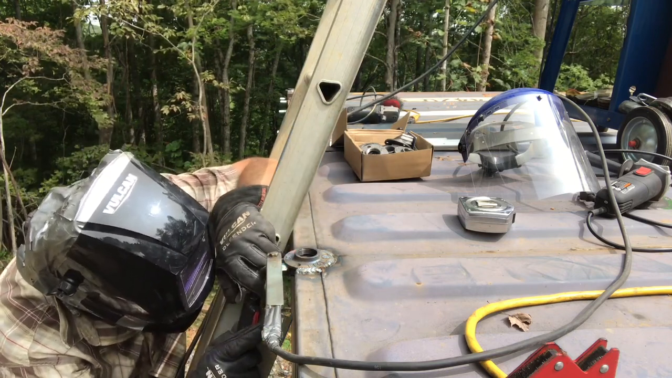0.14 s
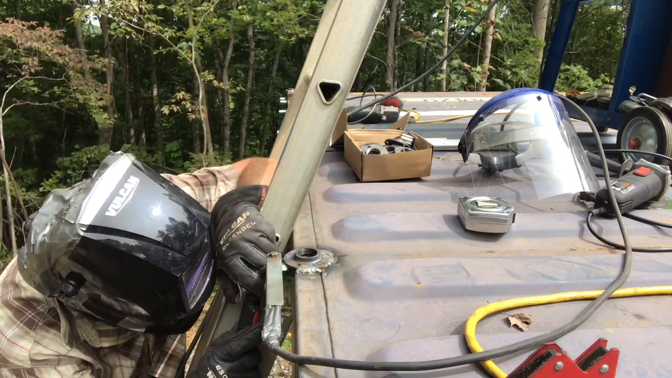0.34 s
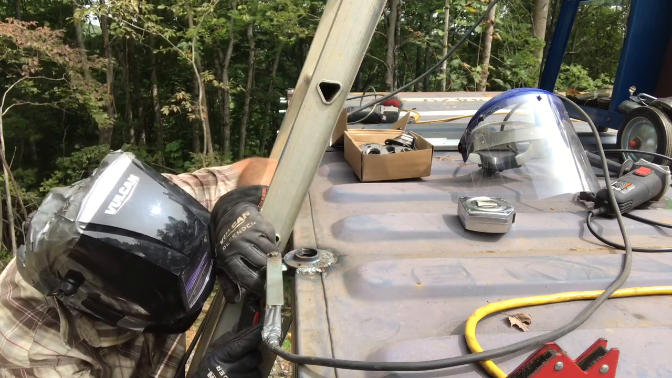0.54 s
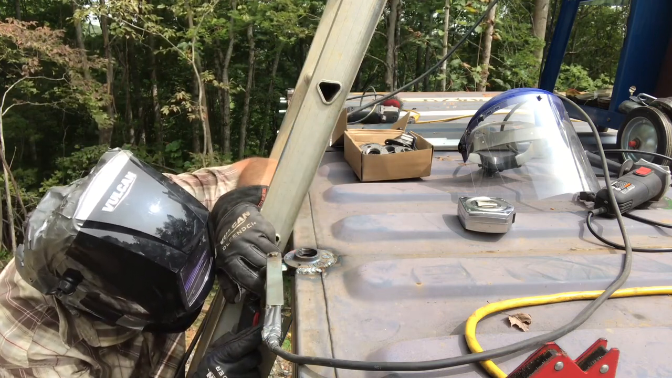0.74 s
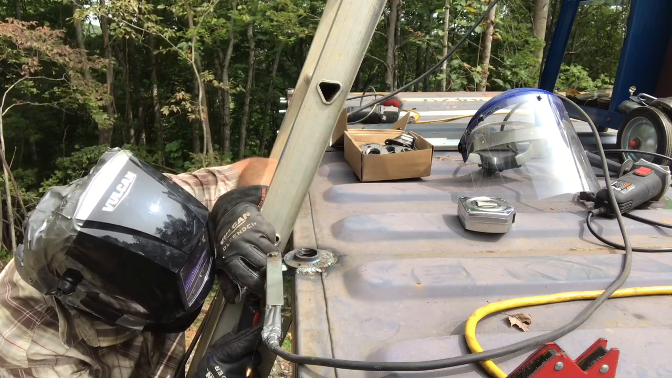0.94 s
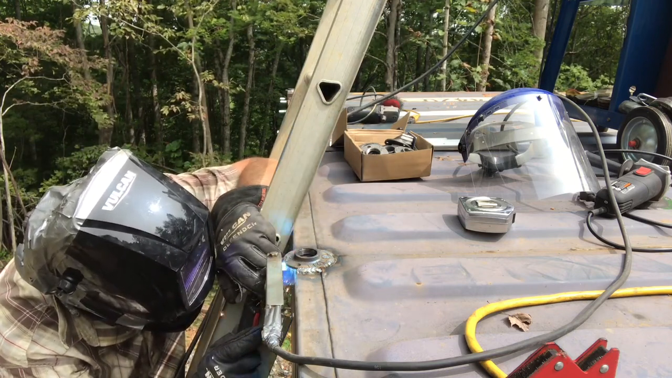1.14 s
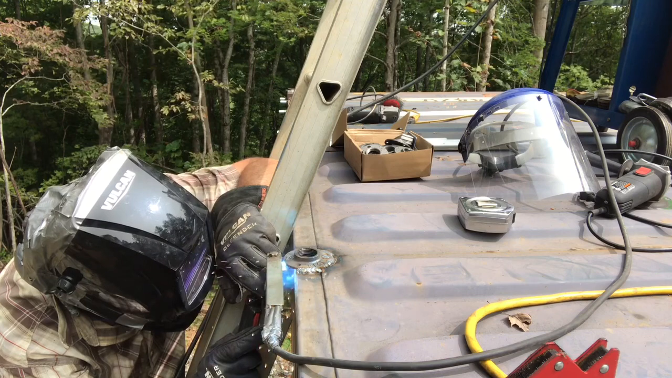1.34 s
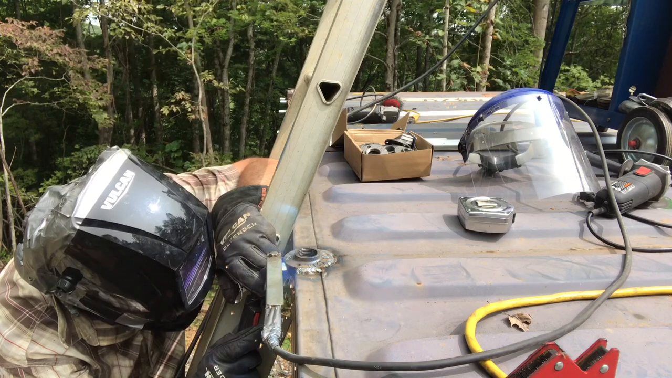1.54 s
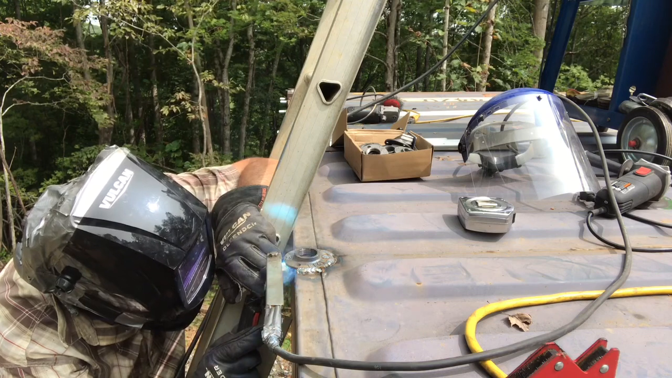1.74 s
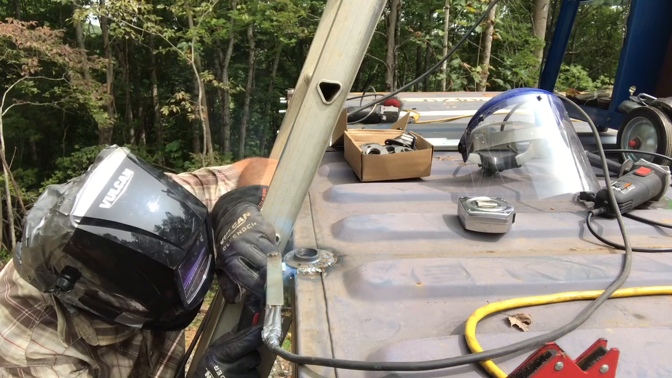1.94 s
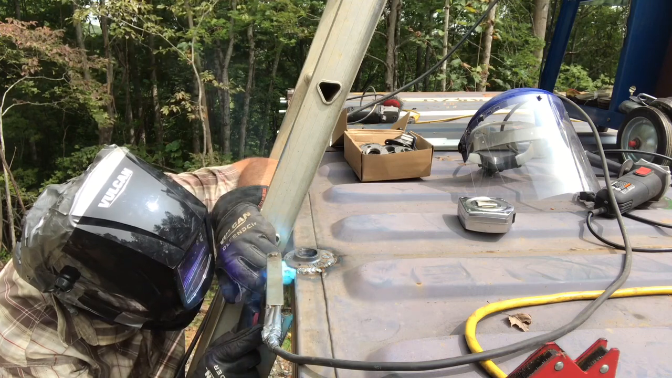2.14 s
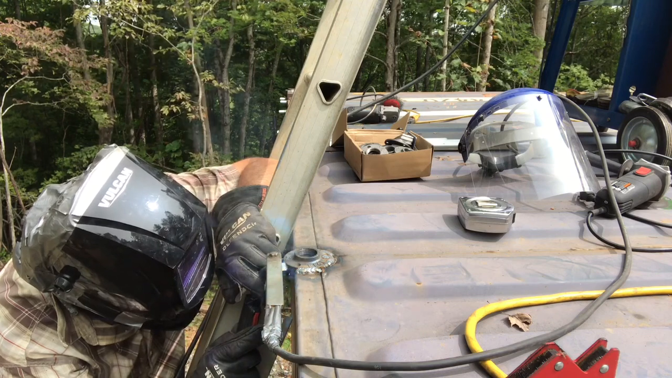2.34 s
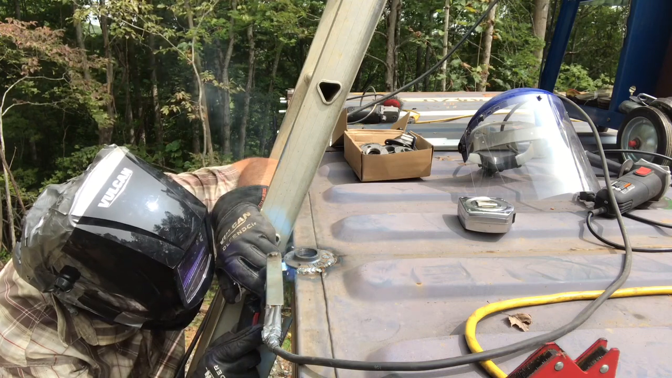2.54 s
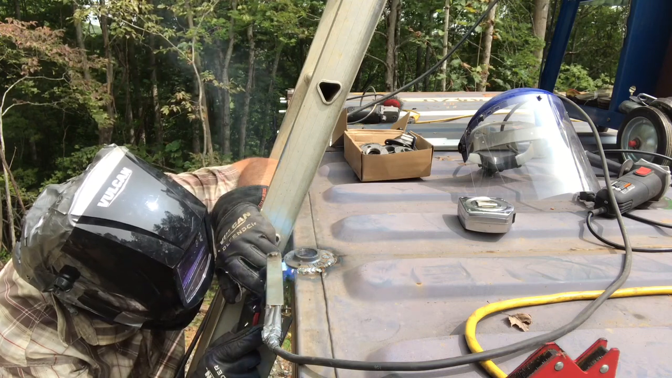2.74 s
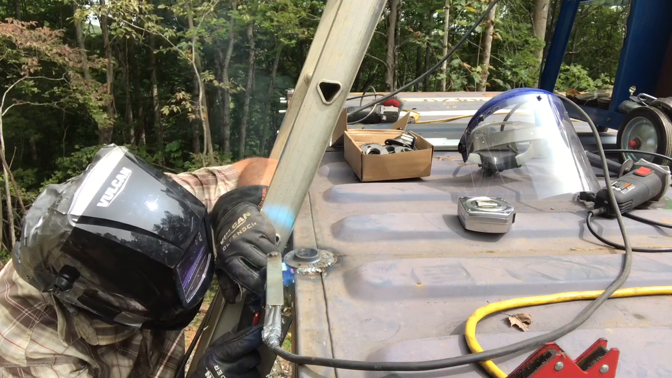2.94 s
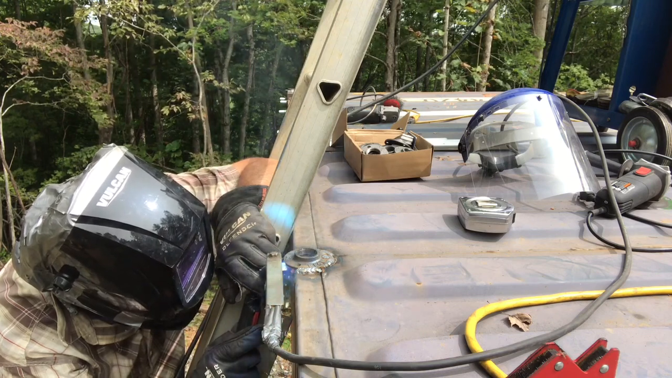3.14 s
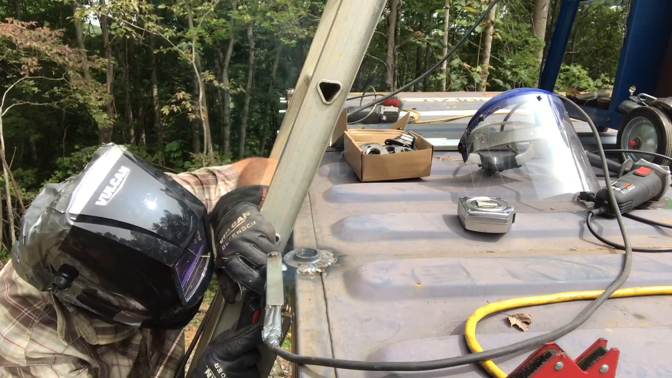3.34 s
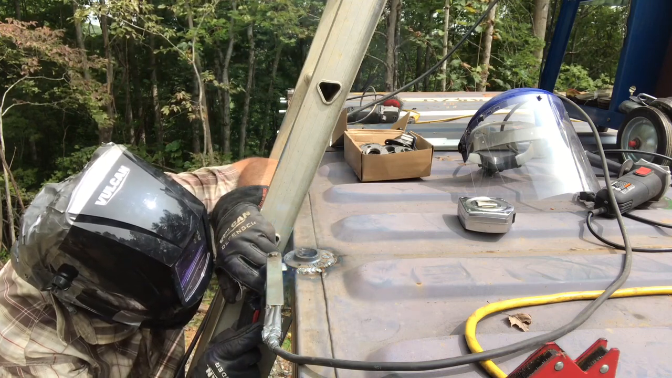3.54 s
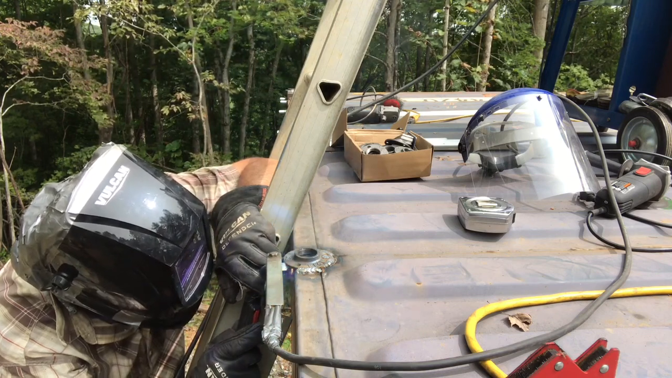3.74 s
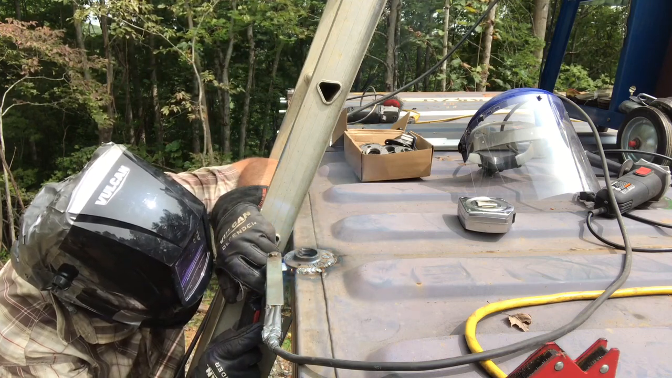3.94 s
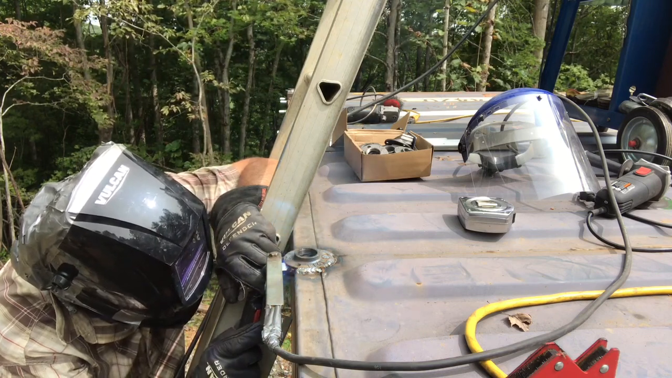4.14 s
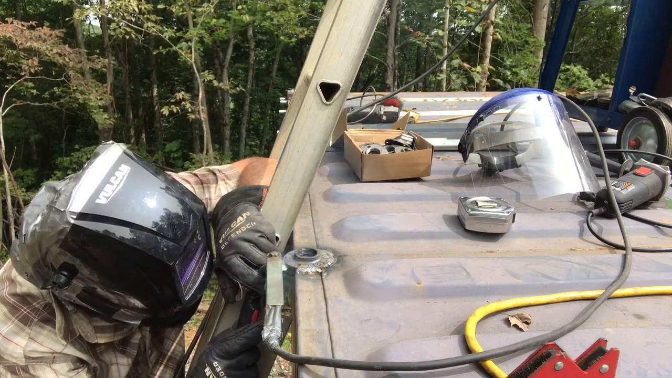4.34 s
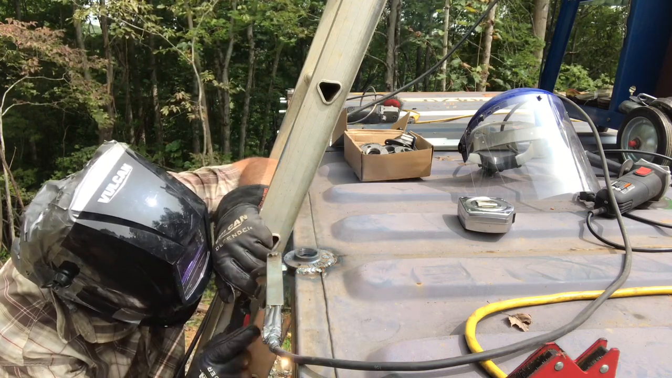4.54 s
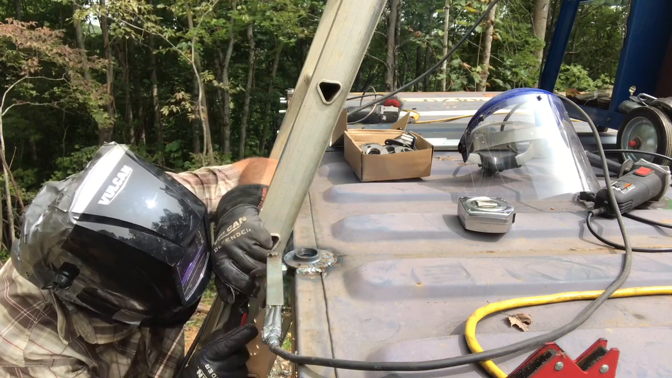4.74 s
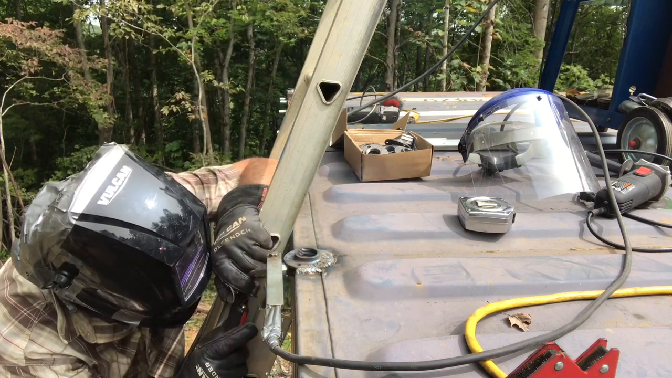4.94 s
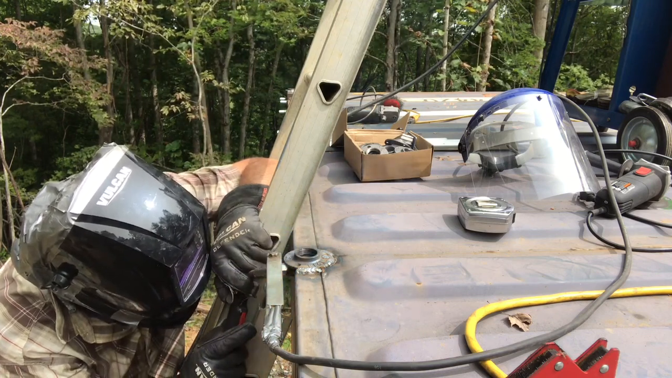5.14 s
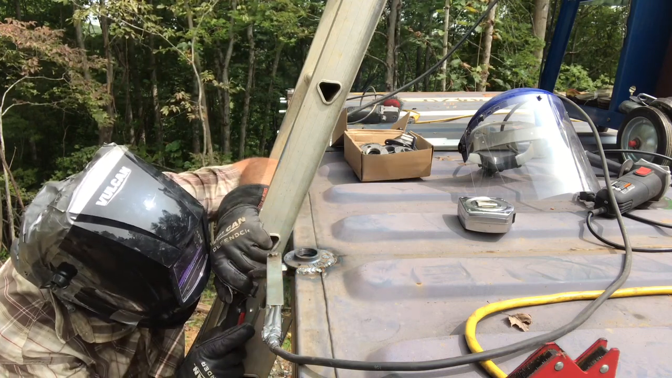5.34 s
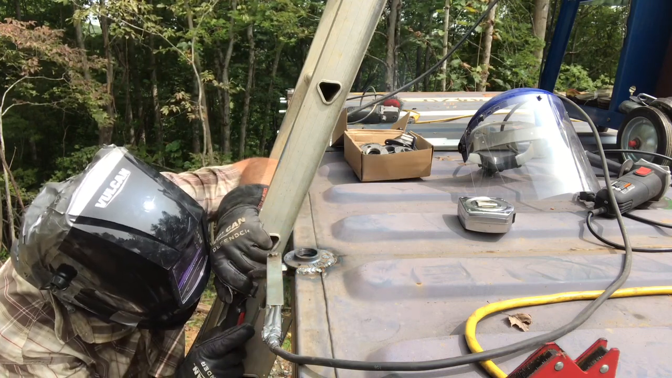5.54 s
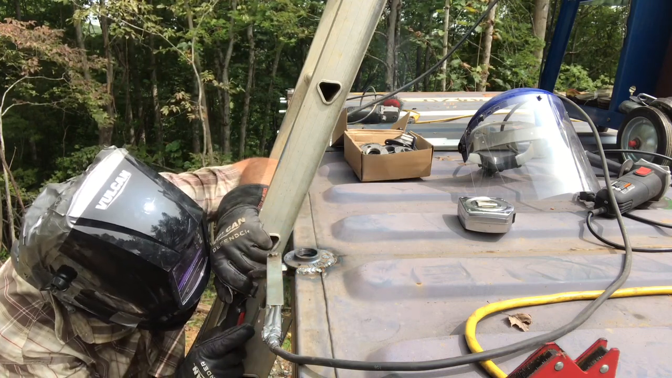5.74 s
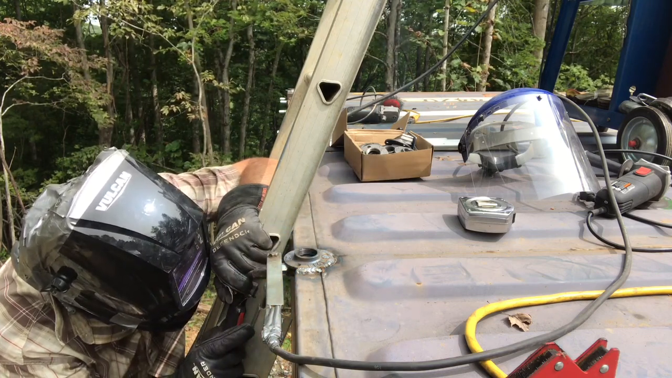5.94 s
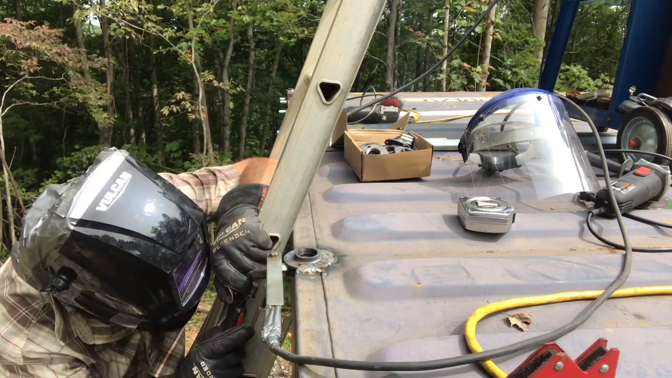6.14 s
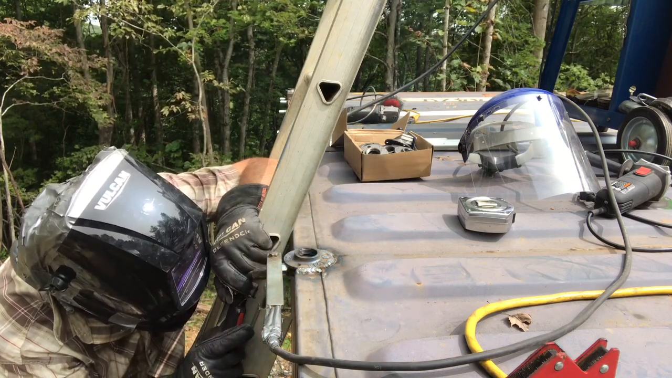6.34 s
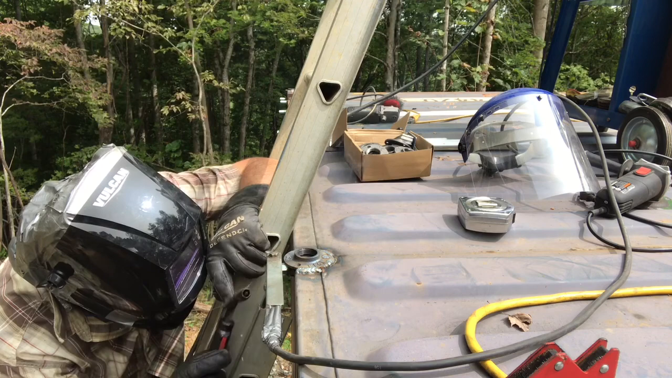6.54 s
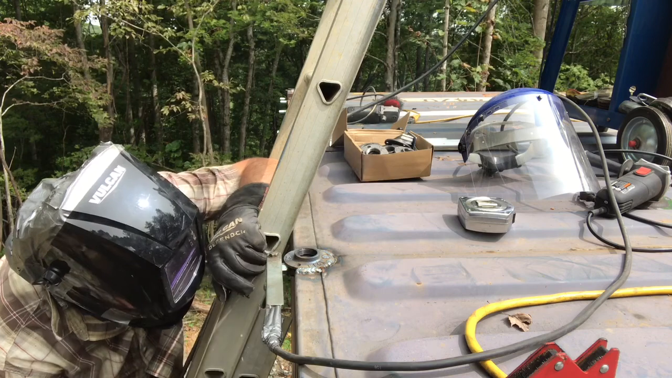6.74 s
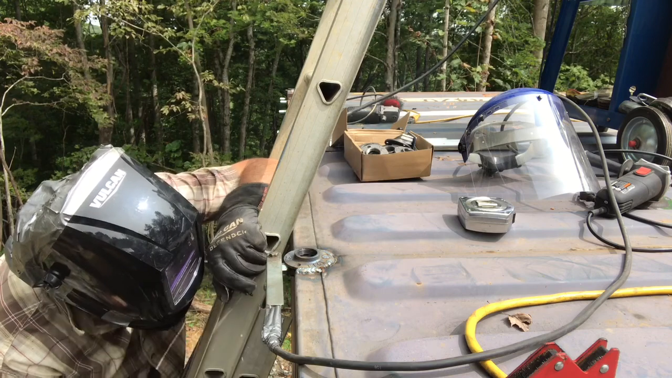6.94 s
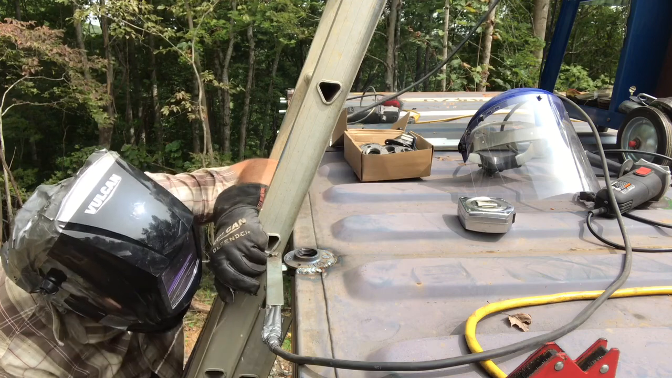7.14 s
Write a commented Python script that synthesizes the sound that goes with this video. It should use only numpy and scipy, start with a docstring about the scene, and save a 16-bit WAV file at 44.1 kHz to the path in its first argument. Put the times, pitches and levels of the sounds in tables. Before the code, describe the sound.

Sharp, spitting sparks of a tack weld on steel, then light knocks of equipment, while an engine generator hums some way off.

```python
"""Tack welding on a metal roof

A wire-feed welder tacks a steel post to a roof, outdoors. Each time the wire shorts and blows clear,
a spark cracks and echoes between post, roof and helmet; the arc sizzles and gas hisses in between.
Gear knocks and a glove slides over the steel. Some way off, an engine generator hums throughout
and sags a little under the load."""
import sys
import numpy as np
from scipy import signal
from scipy.fft import rfft, irfft, next_fast_len
from scipy.io import wavfile

SR = 44100
rng = np.random.default_rng(int(sys.argv[2]) if len(sys.argv) > 2 else 0)


def pcm_store(signal):
    """Save signal as 16-bit PCM."""
    levels = np.round(np.clip(np.atleast_2d(signal), -1, 1) * 32767)
    wavfile.write(sys.argv[1], SR, levels.astype(np.int16).T)


N = 321924
TIME = np.arange(N) / SR

# Runs of shorts while the wire feeds steadily. Each row: first and last spark in seconds, spark count,
# slowing (negative speeds up), first and last relative level in dB, brightness in dB, sizzle in dB.
SPARK_RUNS = [(1.0773, 1.102, 4, -.07, -9.5, -10.5, 7.5, -36), (1.1182, 1.177, 6, .06, -9, -10, 7, -28),
              (1.2068, 1.2535, 4, -.04, -9.5, -7, 5, -34), (1.295, 1.3532, 4, -.06, -11, -9, 6.5, -53),
              (1.3765, 1.5062, 8, .02, -11.5, -11, 4.5, -37),
              (1.5264, 1.5872, 4, -.03, -13.5, -7, 4.5, -37),
              (2.1804, 2.242, 6, .02, -11, -10.5, 8.5, -23.5),
              (2.2627, 2.3679, 6, .15, -10.5, -9, 9.5, -29), (2.4455, 2.454, 2, 0, -9.5, -10.5, 9, -27),
              (2.4847, 2.489, 2, 0, -8, -9.5, 8.5, -30), (2.5165, 2.5237, 2, 0, -9.5, -12, 10, -26),
              (2.6701, 2.7668, 6, .29, -7.5, -9.5, 8.5, -36), (2.7997, 2.945, 6, .01, -11, -11, 3.5, -41),
              (2.9786, 3.061, 4, .155, -10, -8.5, 6.5, -34.5), (3.0837, 3.1705, 4, .05, -9, -10, 5.5, -38),
              (3.2005, 3.3148, 5, -.06, -9, -9, 6, -35)]
# Stray pops as the arc strikes or stumbles.
# Each row: start in seconds, relative level in dB, brightness in dB.
STRAY_POPS = [(.852, -11, 7.5), (.9795, -7, 6), (1.3655, -19, 8), (1.7556, -10.5, 12), (1.7592, -6, 7),
              (1.7708, -19.5, 6), (1.8053, -23, 8), (1.8216, -9.5, 8.5), (1.834, -7.5, 9),
              (2.0201, -26.5, 7), (2.1142, -21.5, 6), (2.124, -9.5, 7), (2.423, -7.5, 9), (2.6366, -8.5, 9),
              (2.97, -10, 2.5), (3.2116, -9.5, 1.5), (3.3072, -22, 4), (3.4952, -10.5, 11.5)]
# Tone of a crack. Each row: frequency in Hz, level in dB.
CRACK_COLOUR = [(100, -17.5), (300, -13), (600, -10.5), (1200, -11), (2400, -1), (3600, -9), (5300, -2),
                (6500, -11), (7500, -5.5), (9700, -11), (11500, -15), (14500, -14), (16000, -28)]
# Peaks and hollows of the steel corner. Each row: centre in Hz, width in Hz, boost or cut in dB.
CORNER_RESONANCES = [(598, 470, 12), (798, 112, -15.5), (1487, 860, 8.5), (1900, 60, -0.5), (2870, 140, 4),
                     (3740, 510, 6), (4687, 160, 9.5), (4770, 170, 0), (5410, 260, 5), (7520, 270, 7.5),
                     (10700, 130, -19), (10970, 280, 8.5), (11500, 510, 7.5), (14200, 200, -19),
                     (13460, 740, 11.5), (14970, 310, 14.5)]
# Bounces off nozzle, post, roof and helmet. Each row: delay in milliseconds, signed gain.
CLOSE_ECHOES = [(0.106, -0.72), (.173, -0.84), (0.516, 0.95), (0.689, 1.15), (0.855, 1.59), (.919, -0.8),
                (1.198, 0.69), (1.357, 0.015), (1.765, 0.22), (1.88, 0.81), (1.94, -0.37), (2.3, -0.28),
                (4.187, 0.64)]
# Ring of the post. Each row: frequency in Hz, gain in dB, time to fade by 60 dB in seconds.
POST_MODES = [(1637, -64, .06), (4797, -64, .07), (5755, -60, .08), (7390, -61, .08), (10910, -65, .06),
              (13941, -62, .06), (14660, -62, .05)]
# Spells of sizzling wire. Each row: centre in seconds, relative level in dB, half length in seconds.
SIZZLE_SPELLS = [(1.052, -42, 0.021), (1.722, -33.5, 0.011), (1.752, -29, 0.0045), (1.78, -28, 0.01),
                 (1.864, -37, 0.019), (2.06, -34, 0.016), (2.119, -26, 0.0089), (2.17, -36, 0.012),
                 (2.585, -36, 0.025), (2.63, -30, 0.0016), (3.703, -48, .05), (4.241, -27.5, 0.014)]
# Tone of the sizzle. Each row: frequency in Hz, level in dB.
SIZZLE_COLOUR = [(2350, -17), (4000, -12.5), (5310, -13.5), (5730, -11), (6440, -19), (7270, -4.5),
                 (9060, -15), (11200, -11), (14600, -4.5), (16000, -1)]
# Resonances of the gas nozzle. Each row: centre in Hz, width in Hz, relative level in dB.
NOZZLE_RESONANCES = [(3210, 140, 4), (5200, 720, 1.5), (5930, 360, 4), (7100, 580, -5), (8100, 790, -5),
                     (9800, 400, -2.5), (11300, 990, -7.5), (14000, 1200, -8), (17400, 700, 4)]
# Gas flow while the trigger is held. Each row: time in seconds, flow from 0 to 1.
GAS_FLOW = [(.64, 0), (.68, 1), (4.34, 1), (4.42, 0)]
# Knocks of torch and gear. Each row: start in seconds, body centre in Hz, filter width in Hz,
# body level in dB, body decay in seconds, tick level in dB.
GEAR_KNOCKS = [(.627, 1580, 1500, -21, .03, -15), (4.645, 650, 804, -10, 0.05, -20),
               (5.005, 903, 998, -24, 0.026, -29), (5.80, 699, 999, -25, .03, -29),
               (6.768, 435, 44.9, -16.5, 0.094, -60)]
# Swell of a glove sliding on steel. Each row: time in seconds, level in dB.
GLOVE_SLIDE = [(6.5, -95), (6.54, -61), (6.64, -57), (6.8, -60), (6.95, -69), (7.05, -95)]
# Tone of the glove. Each row: frequency in Hz, level in dB.
GLOVE_COLOUR = [(5000, 4), (9000, 2), (14000, -2), (16000, -3)]
# Engine hum. Each row: multiple of the firing rate, relative level in dB.
ENGINE_HARMONICS = [(1, -25), (2, 0), (3, -16), (4, -9.5), (5, -19), (6, -26), (7, -7.5), (8, -24),
                    (9, -27), (10, -20), (11, -19), (12, -27), (14, -28), (17, -19), (21, -25), (22, -27),
                    (25, -29), (34, -26), (40, -25), (48, -22), (51, -28), (56, -30), (68, -30)]
# A second, steady hum. Each row: frequency in Hz, level in dB.
DRONE_TONES = [(49, -52.5), (73.5, -44.5), (98.3, -55.5)]
# Tone of engine clatter and forest air. Each row: frequency in Hz, level in dB.
CLATTER_COLOUR = [(180, -16), (300, -4.5), (462, -8.5), (502, -5), (528, -9), (574, -8), (678, -4.5),
                  (749, -8), (1560, -6), (2030, -10), (3190, -11), (6410, -20), (10200, -32), (14500, -40),
                  (16000, -50)]
# Tone of the exhaust rumble. Each row: frequency in Hz, level in dB.
EXHAUST_COLOUR = [(15, -22), (35, -8), (70, 12), (140, 17.5), (270, 13), (420, -21)]
# Tone of the air that differs between the ears. Each row: frequency in Hz, level in dB.
WIDE_AIR_COLOUR = [(60, -12), (130, 6.5), (220, 2), (350, -5.5), (600, -1.5), (1200, -12), (2500, -36.5),
                   (5000, -51), (16000, -60)]


def spark_train(spread_db=1.36, treble_per_db=2.17):
    """Cue every spark as (seconds, dB, brightness dB); a bigger drop bursts louder and brighter."""
    train = list(STRAY_POPS)
    for first_s, last_s, count, slowing, first_db, last_db, treble_db, _ in SPARK_RUNS:
        along = np.linspace(0, 1, round(count))
        starts = first_s + (last_s - first_s) * along * (1 - slowing * (1 - along))
        drop_db = spread_db * rng.standard_normal(len(along))
        drop_db -= drop_db.mean()
        levels = first_db + (last_db - first_db) * along + drop_db
        train += zip(starts, levels, treble_db + treble_per_db * drop_db)
    return train


def sparks(train, gain_db=-3, usual_treble_db=3, colour_spread_db=2, shift_ms=.011, size=2048):
    """Each spark is one sharp pulse, coloured by the steel corner and repeated by nearby surfaces."""
    out, hz = np.zeros(N), np.arange(size // 2 + 1) * SR / size
    corner = sum(db / (1 + (2 * (hz - f) / width) ** 2) for f, width, db in CORNER_RESONANCES)
    colour = at_hz(CRACK_COLOUR, hz) + corner
    octaves = np.log2(np.clip(hz, 1000, 16000) / 4000)
    delay_ms, gain = np.transpose(CLOSE_ECHOES)
    for s, db, treble_db in train:
        # a quicker rupture is brighter, and no two drops burst alike
        tilt = .51 * (treble_db - usual_treble_db) * octaves
        ripple = np.interp(hz, np.linspace(0, SR / 2, 24), rng.standard_normal(24))
        pulse = causal(colour + tilt + colour_spread_db * ripple)
        # the arc wanders over the pool, so the echoes shift a little
        shift, swell = rng.standard_normal((2, len(gain)))
        lag_s = (delay_ms + shift_ms * shift) / 1000
        echoes = np.exp(-2j * np.pi * np.outer(hz, lag_s)) @ (gain * (1 + .068 * swell))
        crack = irfft(pulse * (1 + echoes))
        crack *= np.sqrt(.004 * SR / np.sum(crack ** 2))  # the energy of 4 ms at rms 1
        add(out, s, from_db(db + gain_db) * crack)
    # the cracks carry no deep bass
    return signal.sosfilt(signal.butter(2, 120, "high", fs=SR, output="sos"), out)


def post_ring(cracks):
    """The cracks set the steel post ringing, high and short."""
    return sum(from_db(db) * ring(cracks, hz, t60) for hz, db, t60 in POST_MODES)


def surroundings(cracks):
    """Scatter from the roof, a slap from the gear behind and a thin tail from the trees."""
    response = np.zeros(N)
    add(response, .0026, from_db(-17) * dying_noise(t60=.029))
    add(response, .0163, from_db(-24) * dying_noise(t60=.0081))
    add(response, .008, from_db(-29) * dying_noise(t60=.13))
    return signal.fftconvolve(cracks, response[:SR // 2])[:N]


def arc_envelope(attack_s=.027, release_s=.03):
    """The arc builds up to each run of sparks, holds, and dies away."""
    level = np.zeros(N)
    for first_s, last_s, *_, sizzle_db in SPARK_RUNS:
        fade = np.maximum(first_s - TIME, 0) / attack_s + np.maximum(TIME - last_s, 0) / release_s
        level = np.maximum(level, from_db(sizzle_db) * np.exp(-np.minimum(fade, 20)))
    return level


def arc_sizzle(train, runs_db=-1, flutter_db=5, lead_s=.0067, lead_db=-23):
    """The wire sizzles through the runs, in short spells, and in a quick swell into each spark."""
    level = from_db(runs_db) * arc_envelope()
    for s, db, half_s in SIZZLE_SPELLS:
        level = np.hypot(level, from_db(db) * bump(s, half_s))
    swell = np.linspace(0, 1, int(lead_s * SR))
    for s, db, _ in train:
        add(level, s - lead_s, from_db(db + lead_db) * swell)
    sizzle = noise(SIZZLE_COLOUR) * from_db(flutter_db * drift(rate=300))
    # the surfaces that repeat the sparks also comb the sizzle
    echoes = sum(gain * np.interp(TIME - ms / 1000, TIME, sizzle) for ms, gain in CLOSE_ECHOES)
    return level * rms_one(sizzle + echoes)


def gas_hiss(level_db=-49):
    """Gas hisses through the nozzle's resonances while the trigger is held."""
    jet = sum(from_db(db) * resonate(rng.standard_normal(N), hz, width)
              for hz, width, db in NOZZLE_RESONANCES)
    return in_time(GAS_FLOW) * from_db(level_db) * rms_one(jet)


def handling():
    """The glove slides with a soft hiss; each knock is a tick over a short, dull rattle."""
    out = from_db(in_time(GLOVE_SLIDE)) * noise(GLOVE_COLOUR)
    for s, hz, width, db, t60, tick_db in GEAR_KNOCKS:
        body = resonate(resonate(dying_noise(t60), hz, width), hz, width)
        add(out, s, from_db(db) * body / np.linalg.norm(body))
        add(out, s, from_db(tick_db) * dying_noise(t60=.013))
    return out


def engine_speed(idle_hz=31.78, sag_hz=.68, load_on_s=.8, load_off_s=4.35, governor_s=.1082):
    """Firings per second: the engine sags when the load comes on and recovers when it goes."""
    on, off = (1 - np.exp(-np.maximum(TIME - s, 0) / governor_s) for s in (load_on_s, load_off_s))
    return idle_hz - sag_hz * (on - off)


def generator(hum_db=-38, swell_db=2, waver_db=2, wobble=.00198, clatter_db=-44.5, exhaust_db=-52.5):
    """The engine hums and its clatter throbs at the firing rate, over a drone and exhaust rumble."""
    phase = 2 * np.pi * np.cumsum(engine_speed() * (1 + wobble * drift(rate=9))) / SR
    hum = np.zeros(N)
    for k, db in ENGINE_HARMONICS:
        gain = from_db(db + waver_db * np.log10(k) * drift(rate=7))  # upper harmonics waver more
        hum += gain * np.sin(round(k) * phase + 2 * np.pi * rng.random())
    # one swell as the weld ends
    hum = from_db(hum_db + swell_db * bump(centre_s=4.12, half_s=.29)) * rms_one(hum)
    drone = sum(from_db(db) * np.sin(2 * np.pi * (hz * TIME + rng.random())) for hz, db in DRONE_TONES)
    throb = 1 + .053 * np.sin(phase) + .025 * np.sin(2 * phase)
    clatter = from_db(clatter_db) * noise(CLATTER_COLOUR) * throb
    return hum + drone + clatter + from_db(exhaust_db) * noise(EXHAUST_COLOUR)


def wide_air(level_db=-59):
    """A faint bed of low air, opposite in the two ears for width."""
    return from_db(level_db) * noise(WIDE_AIR_COLOUR) * np.array([[1], [-1]])


def from_db(db):
    """Decibels to gain."""
    return 10 ** (np.asarray(db) / 20)


def rms_one(x):
    """Scale to unit rms."""
    return x / np.sqrt(np.mean(x ** 2) + 1e-20)


def in_time(points):
    """An envelope through (seconds, value) points."""
    return np.interp(TIME, *np.transpose(points))


def bump(centre_s, half_s):
    """A bell-shaped swell of height 1."""
    return np.exp(-.5 * ((TIME - centre_s) / half_s) ** 2)


def at_hz(points, hz):
    """Read a spectrum on a log-frequency axis."""
    f, level = np.transpose(points)
    return np.interp(np.log(hz + 1), np.log(f), level)


def noise(spectrum):
    """Noise of a given colour that falls away below its lowest point; rms 1."""
    size = next_fast_len(N)
    hz = np.arange(size // 2 + 1) * SR / size
    gain = from_db(at_hz(spectrum, hz)) * np.minimum(hz / spectrum[0][0], 1) ** 2
    return rms_one(irfft(rfft(rng.standard_normal(size)) * gain, size)[:N])


def drift(rate):
    """A random wander through `rate` points a second; rms 1."""
    knots = rng.standard_normal(2000)
    return rms_one(np.interp(TIME * rate, np.arange(len(knots)), knots))


def causal(level_db):
    """Minimum-phase response with these levels: nothing sounds early."""
    cepstrum = irfft(np.log(from_db(level_db)))
    half = len(cepstrum) // 2
    cepstrum[1:half] *= 2
    cepstrum[half + 1:] = 0
    return np.exp(rfft(cepstrum))


def ring(x, hz, t60):
    """A unit click sets a sine of height 1 ringing."""
    r, w = np.exp(-np.log(1000) / (t60 * SR)), 2 * np.pi * hz / SR
    return signal.lfilter([0, np.sin(w)], [1, -2 * r * np.cos(w), r * r], x + 1e-18)


def resonate(x, hz, width):
    """A resonance with gain 1 at its top."""
    r, w = np.exp(-np.pi * width / SR), 2 * np.pi * hz / SR
    return signal.lfilter(np.array([1, 0, -1]) * (1 - r * r) / 2, [1, -2 * r * np.cos(w), r * r], x)


def dying_noise(t60, size=16384):
    """A burst of noise that dies away; unit energy."""
    burst = rng.standard_normal(size) * np.exp(-np.log(1000) * np.arange(size) / (t60 * SR))
    return burst / np.sqrt(np.sum(burst ** 2))


def add(out, s, sound):
    """Mix a sound in at s seconds."""
    at = max(int(s * SR), 0)
    out[at:at + len(sound)] += sound[:max(N - at, 0)]


def scene():
    """Weld, handling and generator sit in the centre; only the air is wide."""
    train = spark_train()
    cracks = sparks(train)
    weld = cracks + post_ring(cracks) + surroundings(cracks) + arc_sizzle(train) + gas_hiss()
    return weld + wide_air() + handling() + generator()


def record(dry, ceiling=.85, cutoff_hz=16000):
    """Round off the sharpest peaks and cut the very top."""
    rounded = ceiling * np.tanh(dry / ceiling)
    lowpass = signal.firwin(201, cutoff_hz, window="blackman", fs=SR)
    return signal.fftconvolve(rounded, lowpass[None], "same", axes=1)


dry = scene()
out = record(dry)
pcm_store(out)
```